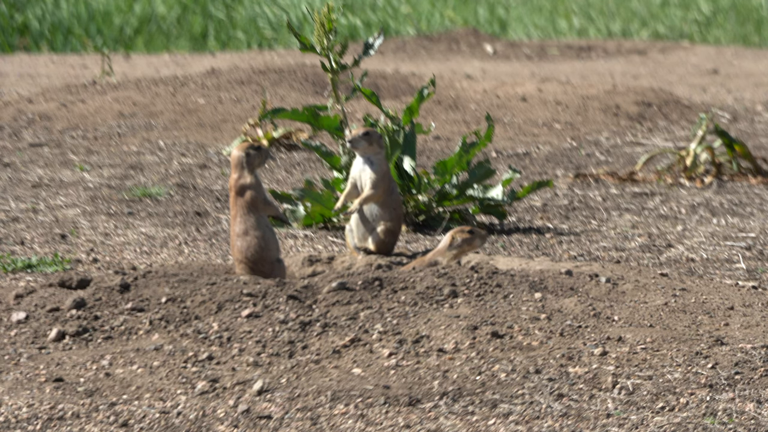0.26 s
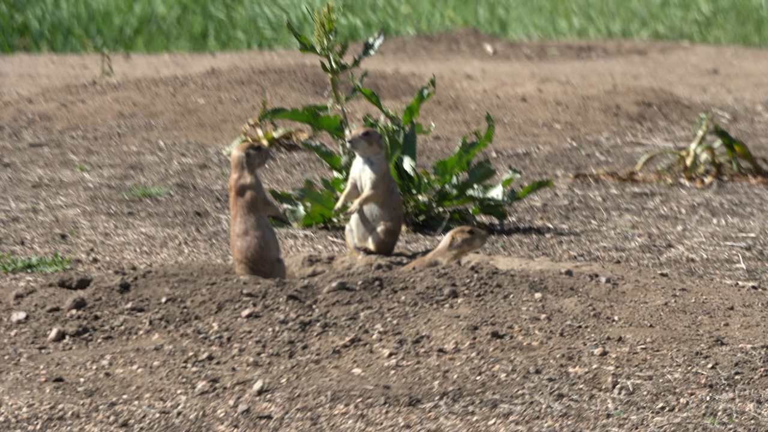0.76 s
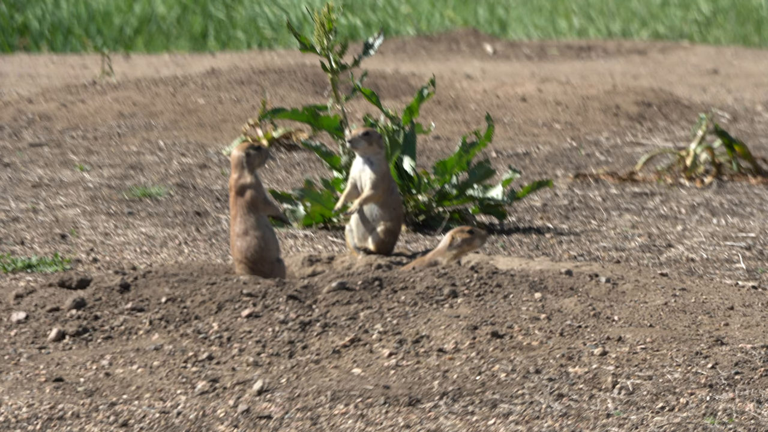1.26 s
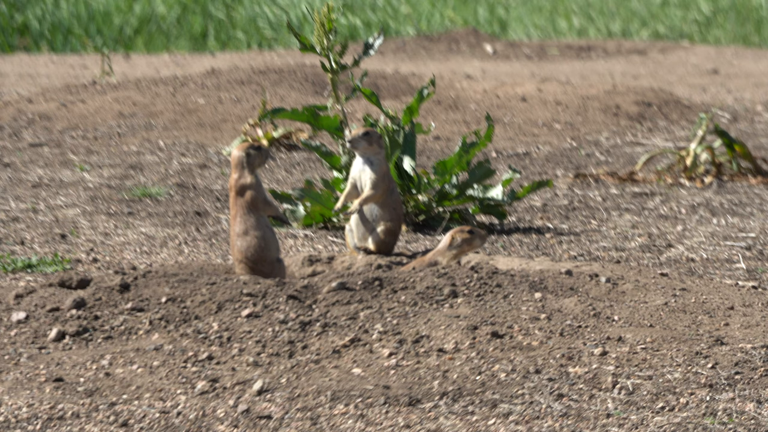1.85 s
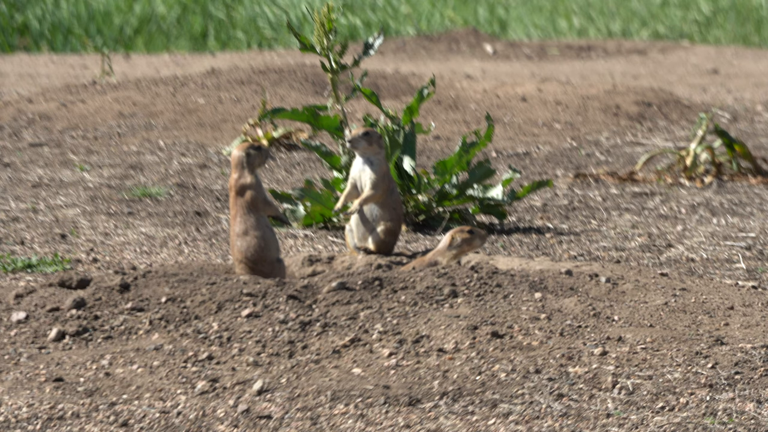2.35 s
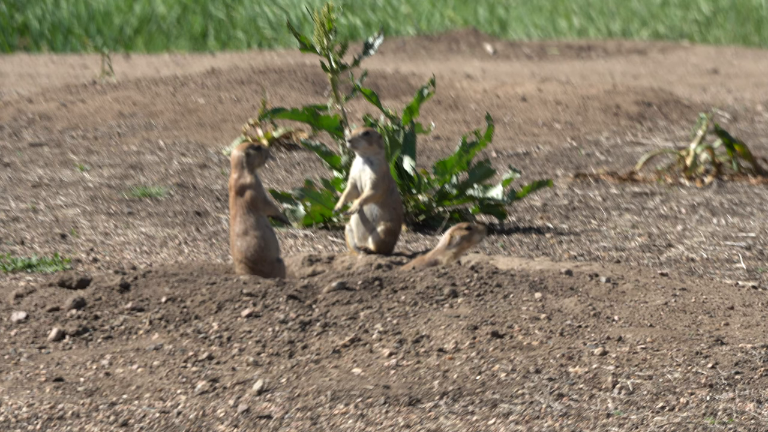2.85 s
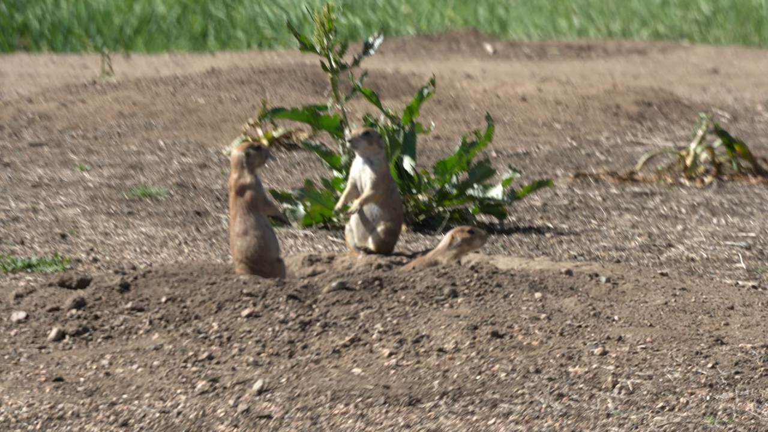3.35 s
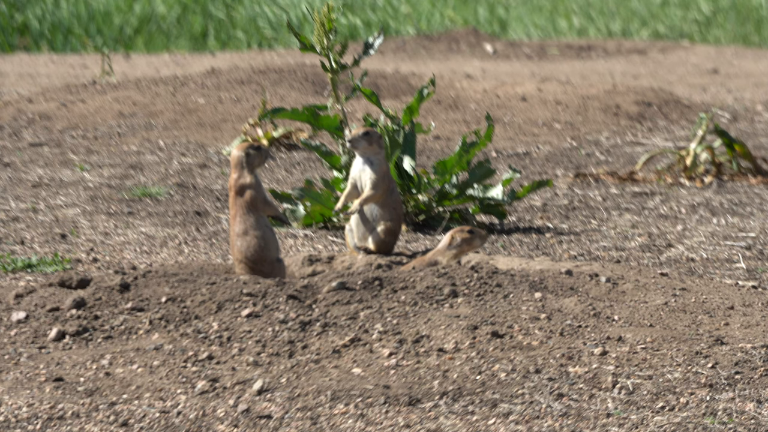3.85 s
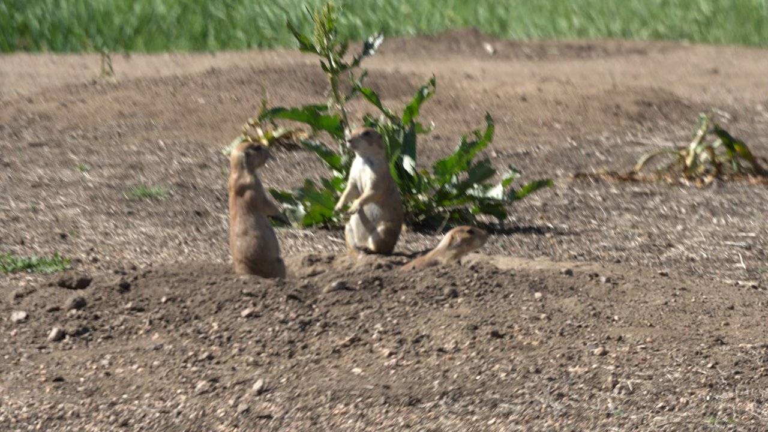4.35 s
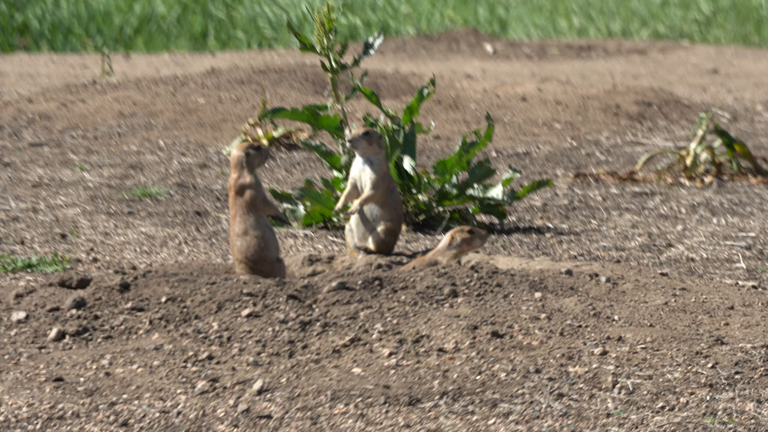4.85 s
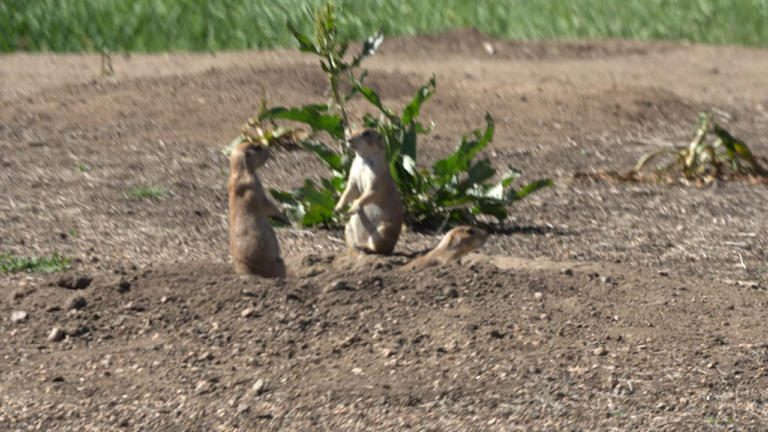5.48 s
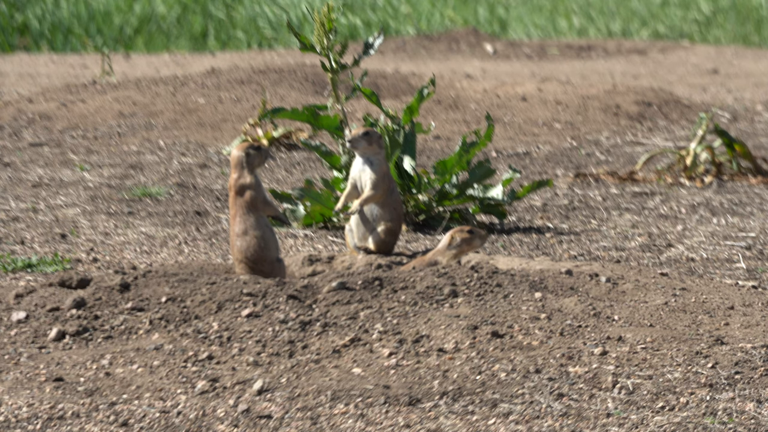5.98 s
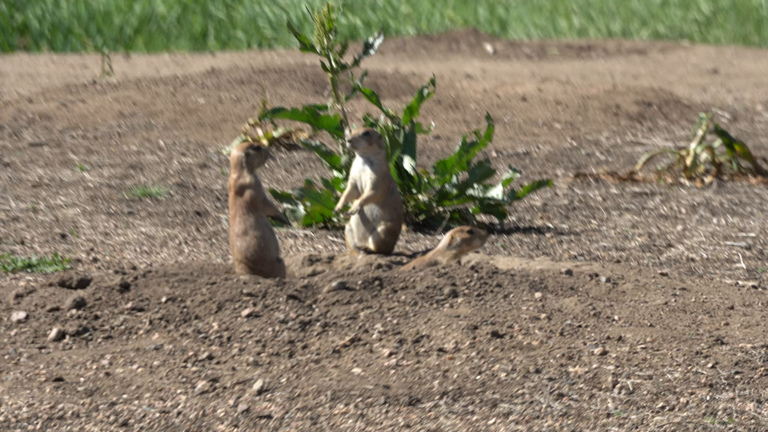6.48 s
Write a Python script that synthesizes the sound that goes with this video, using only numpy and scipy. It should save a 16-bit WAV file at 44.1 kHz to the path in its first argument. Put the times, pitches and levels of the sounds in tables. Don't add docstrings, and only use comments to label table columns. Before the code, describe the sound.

A prairie dog some way off barks six short, high, squeaky yips, each leaping up, breaking to a held note and dropping, followed by a faint blurred return from trees. Between the first two and the rest, a closer animal gives one cleaner, lower yip. Faint birds trill and twitter later. Distant engine drone fades early under steady road rush and microphone hiss; open, dry grassland.

```python
import sys
import numpy as np
from scipy import signal
from scipy.fft import rfft, irfft, next_fast_len
from scipy.io import wavfile
from scipy.ndimage import uniform_filter1d

SR = 44100
rng = np.random.default_rng(int(sys.argv[2]) if len(sys.argv) > 2 else 0)


def invert_db(level):
    return 10 ** (np.asarray(level, dtype=float) / 20)


def persist_wave(psi):
    counts = np.round(np.clip(psi, -1, 1) * 32767).astype(np.int16)
    wavfile.write(sys.argv[1], SR, np.atleast_2d(counts).T)


N = 296352

# [t/s, length/s, crest f/Hz, held f/Hz, level/dB]
FAR_BARKS = [
    (0.096, 0.082, 2418, 2046, -31),
    (1.184, 0.078, 2330, 1961, -35.5),
    (3.267, 0.076, 2359, 1989, -32.5),
    (4.191, 0.073, 2267, 1946, -32),
    (5.097, .08, 2425, 1996, -36),
    (6.0455, 0.084, 2415, 1978, -32.5),
]
# [first partial/dB, upper partials/dB, sent to the trees/dB, opening pop/dB, break t/s]
BARK_MANNER = [
    (-8.5, 2, -0.5, 2.5, .022),
    (-3.5, 4.5, 1.4, -3.5, .022),
    (-3.5, 5, 0.5, 1, .022),
    (-5.5, -0.5, -1.5, -0.5, .022),
    (1.5, 4.5, 4.5, 2, .022),
    (-0.7, -8, 1.5, 0.5, .0225),
]
# [share of length, level/dB]
BARK_EFFORT = [(0, -15), (.025, -6), (.09, -1.5), (.17, 2.5), (.27, 0.1), (.8, -2.1), (0.899, -6), (1, -26)]
# [f/Hz, level/dB]
FAR_THROAT = [(1500, -17), (2000, -8), (2350, 0), (3300, -0.5), (3900, 3), (4300, -7), (4650, -15),
              (5900, -11.5), (6900, -6), (7800, -36), (9400, -22.5), (10000, -34.5), (12000, -41.5),
              (15000, -61.5)]
OPEN_SHARE, SAG_SHARE, DROP_SHARE = .88, 0.024, .26
LEAP_S, BREAK_S, DROP_S = 0.00604, 0.0089, 0.00686
BREAK_LEAVES = .45
SLIPS_PER_BARK, SLIP_CYCLES = 4, .17

# [t/s, f/Hz, level/dB]
NEAR_BARK = [
    (2.792, 1560, -29),
    (2.796, 1588, -26.5),
    (2.803, 1827, -13.5),
    (2.813, 1901, -12.5),
    (2.822, 1827, -13),
    (2.841, 1757, -18),
    (2.855, 1663, -23),
    (2.862, 1470, -34.5),
    (2.869, 1264, -47.5),
]
# [f/Hz, level/dB]
NEAR_THROAT = [(1400, -7), (1700, -20.5), (1880, -19), (2700, 0.5), (3600, 0.5), (4900, -25), (5150, -26.5),
               (5550, -20.5), (6900, -28.5), (7250, -25.5), (7550, -34.5), (9000, -44), (11000, -50),
               (15000, -70.5)]

# [t after the sound/s, level/dB]
BARK_RETURN = [(.004, -51.5), (.03, -60.5), (.1, -72.5), (.16, -58.5), (.25, -52.5), (.4, -62.5),
               (.55, -72.5), (0.799, -82)]
NEAR_RETURN = [(.004, -67.5), (.05, -72.5), (.12, -70.5), (.18, -64.5), (.3, -72.5), (.5, -89), (.8, -85)]
BIRD_RETURN = [(.002, -31.5), (.012, -39.5), (.03, -38.5), (.06, -43), (0.121, -53), (.3, -61.5)]
# [f/Hz, level/dB]
BARK_RETURN_COLOUR = [(1500, 8), (2000, 0.5), (2400, -1), (3500, 4), (4100, -6.5), (4800, 0), (6000, -8.5),
                      (7500, -16.5), (12000, -41)]
NEAR_RETURN_COLOUR = [(1800, 3), (2600, 3.5), (3600, -1.4), (4700, 15), (5600, 1), (7400, 3), (10000, -17)]

# [t after its start/s, f/Hz, level/dB]
TRILL_NOTE = [
    (0, 2384, -16.5),
    (.014, 2457, -7.5),
    (.024, 2792, -1),
    (.032, 3295, 0.5),
    (.039, 3704, 7),
    (.047, 3800, -2),
    (.053, 3930, -8),
    (.056, 4000, -14.5),
]
TRILL_S, TRILL_GAP_S, TRILL_SLOWING_S, TRILL_DB = 4.208, .0815, .00034, -51
TUMBLE_S, TUMBLE_GAP_S, TUMBLE_FLOOR_HZ, TUMBLE_ABOVE_HZ, TUMBLE_KEEPS = 3.336, .019, 3950, 1000, 0.61
TUMBLE_DB, TUMBLE_PEAK_NOTE, TUMBLE_SLOPE_DB = -48, 3.4, 3
# [t/s, centre f/Hz, level/dB]
QUAVER = [
    (3.811, 3840, -43.5),
    (3.83, 3950, -48.5),
    (3.862, 3856, -48.5),
    (3.882, 3450, -50),
    (3.897, 2890, -57.5),
    (3.918, 2540, -57),
]
QUAVER_RATE_HZ, QUAVER_SWING_HZ, QUAVER_DYING_S = 69, 420, 0.049
# [t after its start/s, f/Hz, level/dB]
DIP = [
    (0, 7040, -70),
    (.01, 7300, -67),
    (.018, 5200, -53.5),
    (.024, 6350, -56),
    (.033, 7050, -56.5),
]
DIP_STARTS = [
    4.004,
    4.067,
]
# [t/s, f/Hz, level/dB]
SLIDE = [
    (4.13, 6160, -54),
    (4.16, 4620, -50),
    (4.175, 4100, -48),
    (4.186, 4130, -50),
]

STROKES_S, STROKE_GAP_S, STROKE_S = 5.997, .0838, .03
STROKE_FROM_HZ, STROKE_TO_HZ, STROKE_DB, STROKE_FADING_DB = 2550, 3850, -53.5, 1.7
# [t/s, length/s, f/Hz, level/dB, width/Hz]
BUZZES = [(0.938, .02, 3950, -64.5, 320), (1.042, 0.043, 3950, -64, 320), (1.498, 0.36, 2475, -67.5, 149),
          (2.29, 0.36, 2490, -67.5, 160), (2.329, .028, 3016, -58.5, 220), (2.9, 0.31, 2484, -66.5, 191),
          (3.467, 0.38, 2517, -64, 300), (3.761, 0.29, 2615, -65, 230), (4.298, 0.93, 4590, -77, 300),
          (5.82, .1, 4780, -69, 250), (5.25, 0.14, 5950, -66, 700), (5.61, .29, 3600, -63, 181),
          (5.925, .035, 5090, -59, 500), (6.198, 0.12, 6320, -72, 700), (6.392, 0.26, 2820, -60.5, 390)]
# [t/s, start f/Hz, rise/Hz, level/dB]
FLICKS = [(3.221, 3970, 432, -50), (3.239, 5000, 1185, -58), (3.251, 5440, 678, -56),
          (3.793, 3270, 550, -49), (5.238, 4940, 630, -63), (5.496, 2700, 510, -56.5),
          (5.562, 2780, 790, -56), (5.648, 2600, 596, -57), (5.724, 2904, 800, -56),
          (5.908, 5230, 500, -62), (6.14, 4500, 500, -62), (6.227, 4200, 720, -61),
          (6.304, 4220, 1000, -64), (6.395, 4270, 1000, -65), (6.474, 4200, 780, -64)]
# [t/s, length/s, f/Hz, level/dB]
PIPS = [(2.75, .058, 2890, -66), (3.044, 0.064, 4180, -65), (3.377, .037, 3215, -68),
        (3.625, 0.018, 4915, -54.5), (5.229, 0.037, 4890, -60.5), (5.467, 0.023, 2735, -60),
        (5.53, 0.058, 4140, -58.5), (5.571, 0.026, 3520, -53.5), (5.613, 0.059, 4100, -62),
        (5.619, 0.024, 2640, -59), (5.657, 0.012, 3175, -52), (5.685, .03, 4130, -56.5),
        (5.728, .045, 4100, -55), (5.759, 0.032, 2690, -57), (5.79, 0.039, 4200, -62),
        (5.9, 0.044, 2740, -62.5), (5.921, 0.13, 5710, -67.5), (6.168, 0.021, 2770, -53.5),
        (6.56, .032, 2757, -60), (6.683, 0.027, 2880, -58)]
# [t/s, length/s, start f/Hz, end f/Hz, level/dB]
GLIDES = [(.47, 0.3, 2823, 2800, -75), (.85, 0.18, 2820, 2750, -71), (1.0, 0.27, 2730, 3070, -65),
          (1.305, .034, 3400, 3000, -66), (1.58, .07, 5400, 5850, -71), (1.663, .049, 2970, 3230, -64),
          (1.67, .05, 5100, 5500, -71), (1.66, .074, 4050, 4300, -76), (2.26, 0.088, 2750, 2940, -70),
          (2.36, .06, 2950, 3200, -70), (3.145, 0.028, 6500, 6900, -65), (3.165, .025, 6590, 4500, -66),
          (3.559, .14, 2735, 2930, -64), (3.646, 0.026, 6860, 3800, -63), (3.708, 0.04, 6700, 5700, -66),
          (3.736, .022, 7260, 3550, -59), (4.268, .072, 2850, 3120, -72), (5.788, 0.037, 5000, 6300, -68)]
FLICK_S, FLICK_BUZZ_HZ, PIP_BUZZ_HZ, GLIDE_BUZZ_HZ = 0.0149, 60.3, 70, 15
FAR_DIRECT_DB = -1
ALOFT_RETURN_DB = -5

# [t/s, f/Hz]
ENGINE_SPEED = [
    (0, 55),
    (.2, 55.3),
    (.55, 59.7),
    (1.2, 60),
    (2, 60.8),
]
# [t/s, length/s, multiple of the firing rate, level/dB]
ENGINE_PARTIALS = [(0, .62, 7, -67), (.4, .4, 5, -78), (.55, .3, 10, -63), (.5, .25, 9, -67),
                   (.92, .17, 9, -66), (.8, .4, 8, -71), (.85, .55, 7, -72), (.85, .35, 5, -77),
                   (1.27, .5, 5, -73), (1.4, .45, 8, -68)]
# [f/Hz, level per Hz/dB]
ROAD = [(24, -85), (40, -59), (166, -30), (295, -20), (429, -10.5), (474, -11), (608, -3.5), (655, -6.5),
        (780, 2), (1160, -2), (2120, -19.5), (2590, -13), (3860, -23.5), (7960, -27), (15600, -30)]
RUSH_DB, DRONE_EXTRA_DB, DRONE_FADING_S = -55.5, 7.5, 2


def far_barks():
    here, at_trees = np.zeros((2, N))
    share, shape_db = np.transpose(BARK_EFFORT)
    slips = rng.uniform(-1.1, 1, (len(FAR_BARKS), SLIPS_PER_BARK, 2))
    for bark, manner, slip in zip(FAR_BARKS, BARK_MANNER, slips):
        s, length, crest_hz, held_hz, level_db = bark
        first_db, upper_db, sent_db, pop_db, break_s = manner
        t = np.arange(0, length, 1 / SR)

        leap = (crest_hz - OPEN_SHARE * held_hz) * np.exp(-(t / LEAP_S) ** 1.3)
        after_break = BREAK_LEAVES * np.exp((break_s - t) / BREAK_S)
        above = (crest_hz - held_hz) * np.where(t < break_s, 1, after_break)
        sag = SAG_SHARE * (1 - 2 * t / length) * (t > break_s)
        drop = DROP_SHARE * np.exp((t - length) / DROP_S)
        pitch = uniform_filter1d(held_hz * (1 + sag - drop) + above - leap, size=60)
        pitch *= 1 + 0.01 * wobble(len(t), 140).real
        pitch *= 1 + .022 * wobble(len(t), 1500).real

        slipped = 0
        for at, way in slip:
            slip_s = length * (.42 + .3 * at)
            slipped = slipped + SLIP_CYCLES * way * np.clip((t - slip_s) / 0.00035, 0, 1)

        effort_db = level_db + np.interp(t / length, share, shape_db) + pop_db * np.exp(-(t / 0.0047) ** 2)
        half_db, facing_db = -40, (first_db, upper_db, upper_db - 2)
        add(here, s, voice(pitch, effort_db, FAR_THROAT, -18.5, half_db, facing_db, slipped))
        add(at_trees, s, voice(pitch, effort_db + sent_db, FAR_THROAT, -16.0, half_db))
    return here, at_trees


def near_bark():
    out, (s, hz, level_db) = np.zeros(N), np.transpose(NEAR_BARK)
    t = np.arange(s[0], s[-1], 1 / SR)
    half_db = np.interp(t, [2.806, 2.818, 2.84, 2.852], [-56.5, -30.5, -33.0, -52.0])
    pitch = uniform_filter1d(np.interp(t, s, hz), size=200)
    add(out, s[0], voice(pitch, np.interp(t, s, level_db), NEAR_THROAT, -39.0, half_db))
    return out


def voice(pitch, level_db, throat, rough_db, half_db, facing_db=(0, 0, 0), slipped=0):
    phase = 2 * np.pi * (np.cumsum(pitch) / SR + slipped)
    uneven = 1 + invert_db(rough_db) * wobble(len(pitch), 1600) * np.abs(wobble(len(pitch), 71))
    first_db, third_db, higher_db = facing_db
    folds = 0
    for k in np.arange(1, 8, .5):
        turned_db = first_db * (k < 2) + third_db * (2 < k < 4) + higher_db * (k >= 4)
        partial_db = turned_db + np.where(k % 1, half_db, 0)
        folds = folds + invert_db(partial_db) * np.real(uneven * np.exp(1j * k * phase + 1j * k * k))
    fade_in = np.clip(np.arange(len(pitch)) / 40, 0, 1)
    return coloured(np.sqrt(2) * invert_db(level_db) * fade_in * folds, [(500, -63)] + throat)


def returned(x, returns, colour):
    s, level_db = np.transpose(returns)
    t = np.arange(0, s[-1], 1 / SR)
    clumps_db = 3 * wobble(len(t), 50).real
    response = rng.standard_normal(len(t)) * invert_db(np.interp(t, s, level_db, left=-120) + clumps_db)
    return signal.fftconvolve(x, coloured(response, colour))[:N]


def birds():
    close, far, aloft = np.zeros((3, N))
    low = []
    for k in range(7):
        stroke_db = STROKE_DB - STROKE_FADING_DB * k
        low.append(whistled(STROKES_S + STROKE_GAP_S * k, STROKE_S, STROKE_FROM_HZ, STROKE_TO_HZ, stroke_db, 25))
    low += [whistled(s, length, hz, hz, db, width_hz) for s, length, hz, db, width_hz in BUZZES]
    high = [whistled(s, FLICK_S, hz, hz + rise_hz, db, FLICK_BUZZ_HZ) for s, hz, rise_hz, db in FLICKS]
    high += [whistled(s, length, hz, hz, db, PIP_BUZZ_HZ) for s, length, hz, db in PIPS]
    high += [whistled(*row, GLIDE_BUZZ_HZ) for row in GLIDES]
    for track, notes in (close, songs()), (far, low), (aloft, high):
        for s, sound in notes:
            add(track, s, sound)
    return close, far, aloft


def songs():
    notes = [sung(DIP, s) for s in DIP_STARTS] + [sung(SLIDE)]
    for k in range(11):
        start_s = TRILL_S + TRILL_GAP_S * k + TRILL_SLOWING_S * k * k
        notes.append(sung(TRILL_NOTE, start_s, 1 + 0.0054 * rng.normal(), TRILL_DB))
    for k in range(5):
        above_hz = TUMBLE_ABOVE_HZ * TUMBLE_KEEPS ** k
        start_hz, end_hz = TUMBLE_FLOOR_HZ + above_hz, TUMBLE_FLOOR_HZ + 1.55 * above_hz
        level_db = TUMBLE_DB - TUMBLE_SLOPE_DB * abs(k - TUMBLE_PEAK_NOTE)
        notes.append(whistled(TUMBLE_S + TUMBLE_GAP_S * k, .016 + 0.0037 * k, start_hz, end_hz, level_db, 60))
    s, hz, level_db = np.transpose(QUAVER)
    t = np.arange(s[0], s[-1], 1 / SR)
    swing_hz = QUAVER_SWING_HZ * np.exp(-((t - s[0]) / QUAVER_DYING_S) ** 2)
    swing = swing_hz * np.sin(2 * np.pi * QUAVER_RATE_HZ * (t - s[0] - .004))
    quaver = np.transpose([t, np.interp(t, s, hz) + swing, np.interp(t, s, level_db)])
    return notes + [sung(quaver)]


def sung(rows, start_s=0, bend=1, louder_db=0):
    s, hz, level_db = np.transpose(rows)
    t = np.arange(s[0], s[-1], 1 / SR)
    pitch = bend * uniform_filter1d(np.interp(t, s, hz), size=120)
    level = np.sqrt(2) * invert_db(np.interp(t, s, level_db) + louder_db) * signal.windows.tukey(len(t), .1)
    return start_s + s[0], level * np.sin(2 * np.pi * np.cumsum(pitch) / SR)


def whistled(s, length, start_hz, end_hz, level_db, buzz_hz):
    u = np.arange(0, length, 1 / SR) / length
    tone = np.exp(2j * np.pi * np.cumsum(start_hz + (end_hz - start_hz) * u) / SR)
    blend = np.clip(buzz_hz / 200, 0, 1)
    tone = tone * (np.sqrt(1 - blend) + np.sqrt(blend) * wobble(len(u), buzz_hz))
    return s, np.sqrt(2) * invert_db(level_db) * np.sin(np.pi * u) ** .4 * tone.real


def engine():
    s, hz = np.transpose(ENGINE_SPEED)
    out, turns = np.zeros(N), np.cumsum(np.interp(np.arange(N) / SR, s, hz)) / SR
    for s, length, multiple, level_db in ENGINE_PARTIALS:
        t = np.arange(0, length, 1 / SR)
        swell = np.sin(np.pi * t / length) ** .4 * invert_db(2.5 * wobble(len(t), 8).real)
        tone = np.sin(2 * np.pi * multiple * turns[round(s * SR):][:len(t)])
        add(out, s, np.sqrt(2) * invert_db(level_db) * swell * tone)
    return out


def road():
    drone_db = DRONE_EXTRA_DB * np.exp(-(np.arange(N) / SR / DRONE_FADING_S) ** 2)
    out, edges = 0, 40 * 2 ** np.arange(0, 9, 1 / 3)
    white = rng.standard_normal((2, N))
    for k, (low, high) in enumerate(zip(edges, edges[1:])):
        band = signal.sosfilt(signal.butter(2, [low, high], "band", fs=SR, output="sos"), white[k % 2])
        hz = np.sqrt(low * high)
        moving_db = (drone_db - drone_db.mean()) * (200 < hz < 450)
        gusts_db = 0.54 * np.repeat(wobble(N // 64 + 1, 120).real, 64)[:N]
        out = out + invert_db(at_hz(ROAD, hz) + moving_db + gusts_db) * band
    return invert_db(RUSH_DB + 1.57) * rms_one(out)


def coloured(x, points):
    size = next_fast_len(len(x) + 512)
    gain = invert_db(at_hz(points, np.fft.rfftfreq(size, 1 / SR) + 1))
    return irfft(rfft(x, size) * gain, size)[:len(x)]


def at_hz(points, hz):
    point_hz, level_db = np.transpose(points)
    return np.interp(np.log(hz), np.log(point_hz), level_db)


def wobble(size, width_hz):
    white = rng.standard_normal((2, size + 4000))
    slow = signal.sosfilt(signal.butter(2, width_hz, fs=SR, output="sos"), white)[:, 4000:]
    return rms_one(slow[0] + 1j * slow[1])


def rms_one(x):
    return x / np.sqrt(np.mean(np.abs(x) ** 2) + 1e-20)


def add(track, s, sound):
    i = round(s * SR)
    track[i:i + len(sound)] += sound[:len(track) - i]


def scene():
    (far, at_trees), near, (song, chatter, aloft) = far_barks(), near_bark(), birds()
    animals = far + returned(at_trees, BARK_RETURN, BARK_RETURN_COLOUR)
    animals += near + returned(near, NEAR_RETURN, NEAR_RETURN_COLOUR)
    animals += song + aloft + invert_db(FAR_DIRECT_DB) * chatter
    scattered = song + chatter + invert_db(ALOFT_RETURN_DB) * aloft
    animals += returned(scattered, BIRD_RETURN, [(2000, -0.12), (4000, 1.5), (5500, 4.5), (7000, 0.5)])
    animals = signal.sosfilt(signal.butter(4, 1100, "high", fs=SR, output="sos"), animals)
    return (animals + engine() + road())[None]


def roll_off(x):
    return signal.sosfilt(signal.butter(12, 15760, fs=SR, output="sos"), x)


def record(dry):
    cut = signal.sosfilt(signal.butter(2, 90, "high", fs=SR, output="sos"), dry)
    return roll_off(cut)


dry = scene()
out = record(dry)
persist_wave(out)
```